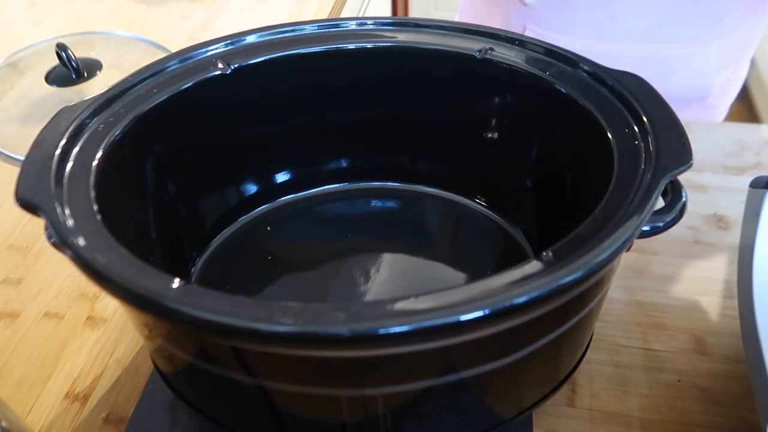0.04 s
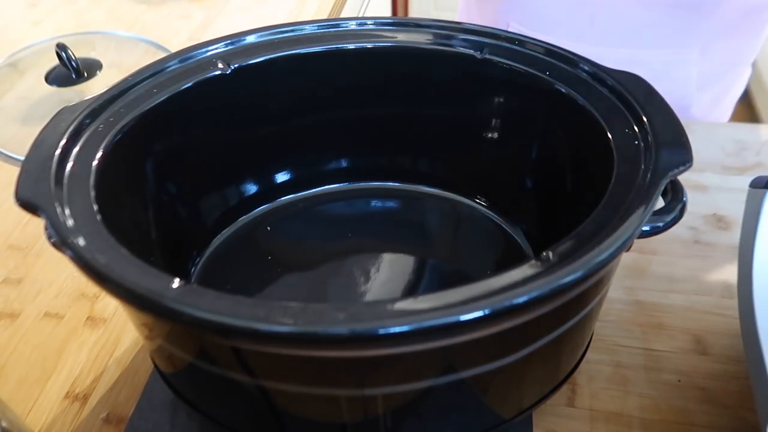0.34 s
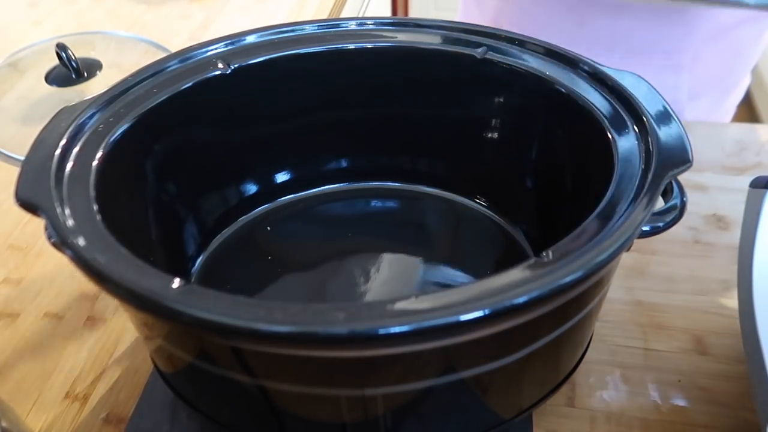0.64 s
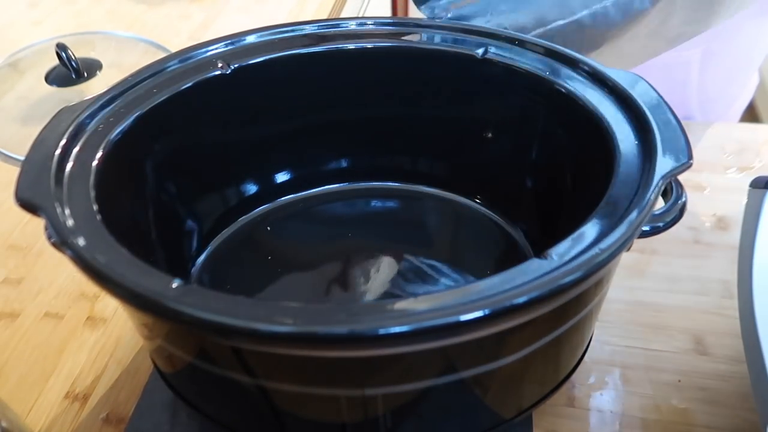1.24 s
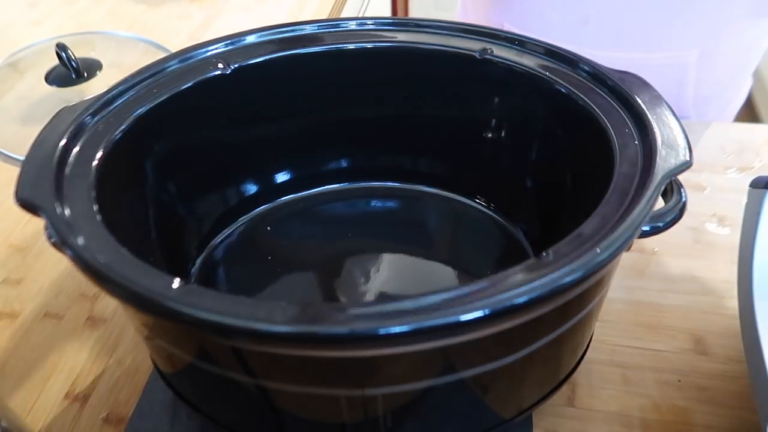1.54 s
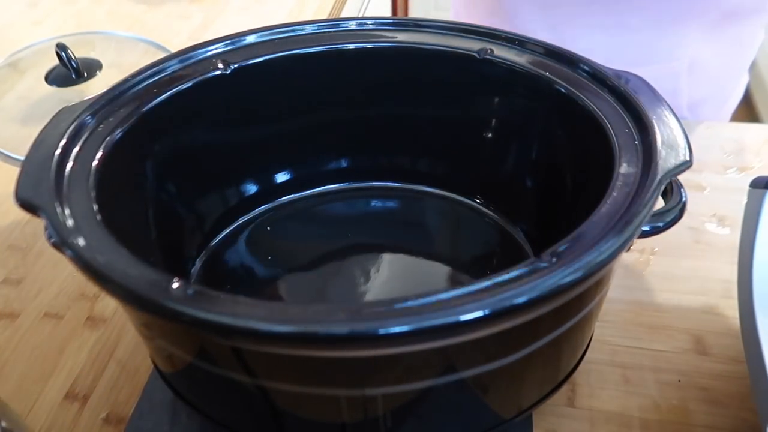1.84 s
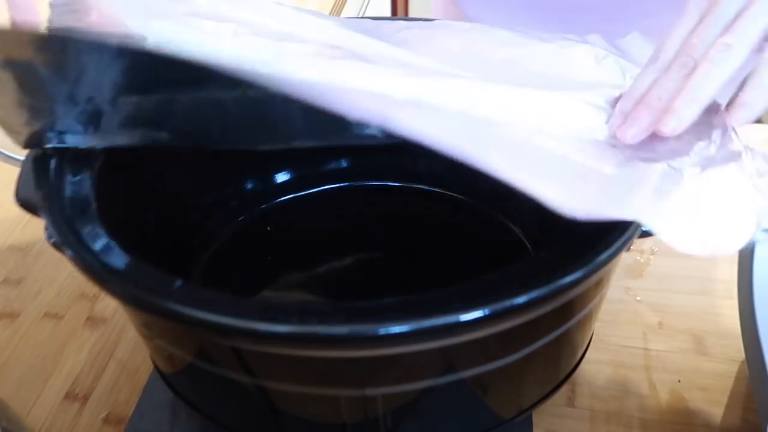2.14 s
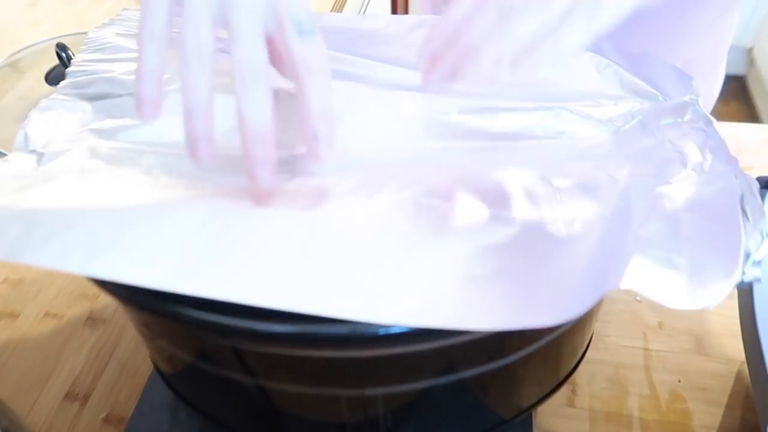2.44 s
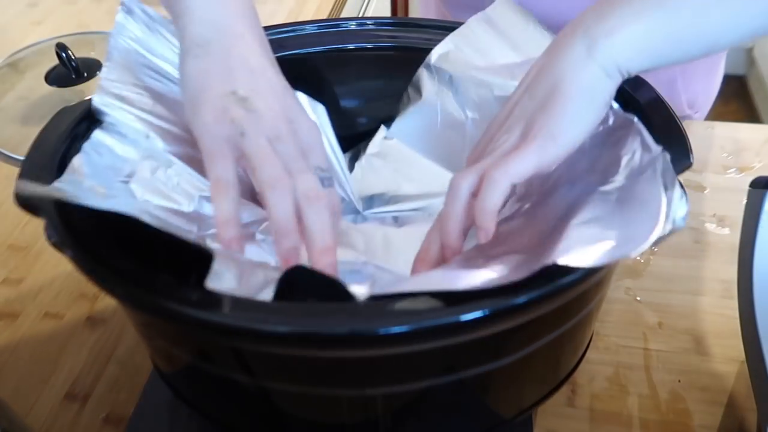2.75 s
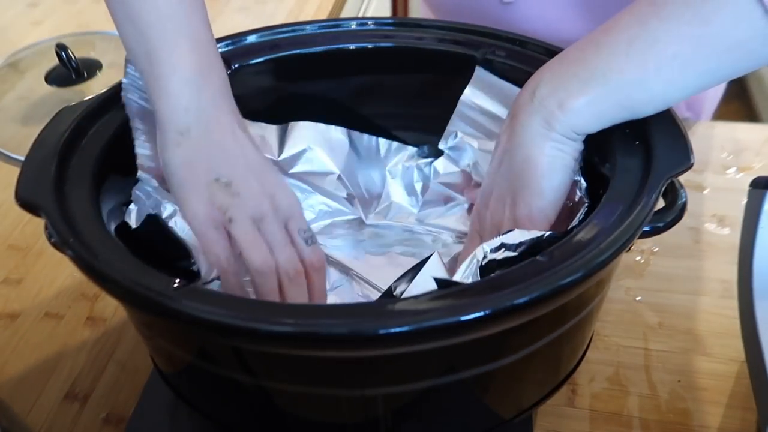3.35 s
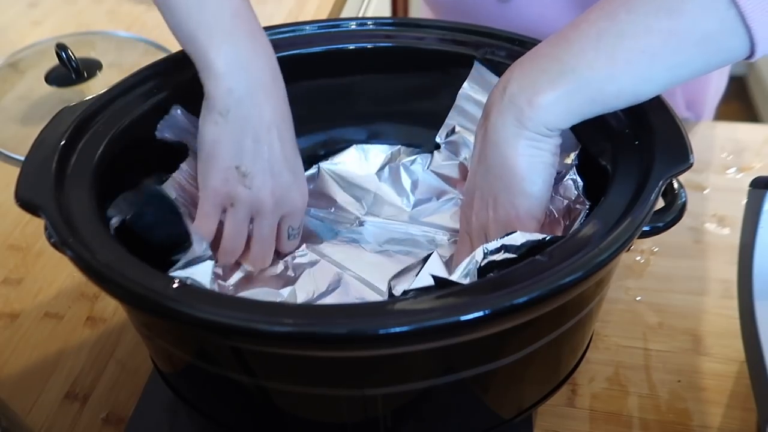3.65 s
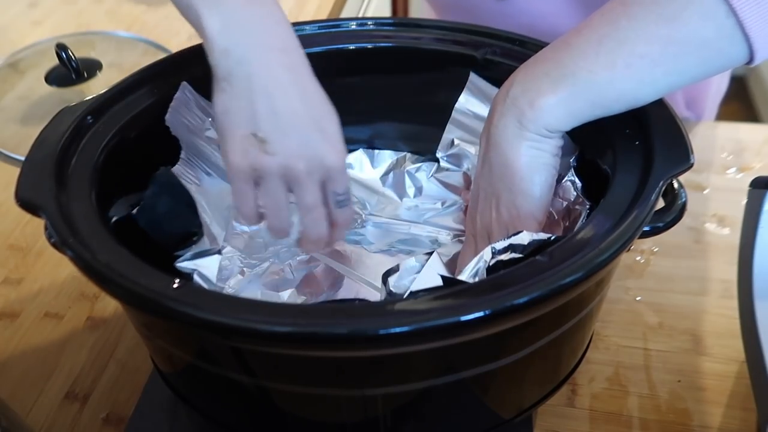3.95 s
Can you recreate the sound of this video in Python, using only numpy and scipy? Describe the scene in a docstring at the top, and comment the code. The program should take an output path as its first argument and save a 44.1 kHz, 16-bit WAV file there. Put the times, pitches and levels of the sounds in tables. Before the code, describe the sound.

Aluminum foil crackles off its roll, slightly to one side, with soft bumps, and tears sharply at 0.6 seconds. At 1 second its cardboard box knocks hollowly on the counter. The loose sheet rustles from 1.4 seconds and crinkles over a ceramic pot, straight ahead, around 2. From 2.5 to 4 seconds, hands crush it inside in louder, uneven crunches, close by in a small kitchen.

```python
"""A small kitchen, close to a wooden counter, in stereo. A little to one side, aluminium foil is pulled
off its roll and torn on the cutter, and the box is set down. The loose sheet rustles through the air;
straight ahead, it is spread over a ceramic cooker pot and two hands crush it into the hollow.
Every rustle is a swarm of tiny buckling creases that ring facets of foil."""
import sys
import numpy as np
from scipy import signal
from scipy.fft import rfft, irfft
from scipy.io import wavfile
from scipy.ndimage import uniform_filter1d

SR = 44100
rng = np.random.default_rng(int(sys.argv[2]) if len(sys.argv) > 2 else 0)


def store_wav(level_fs):
    """Save 16-bit WAV to argv[1]."""
    pcm = np.round(np.clip(np.atleast_2d(level_fs), -1, 1) * 32767)
    wavfile.write(sys.argv[1], SR, pcm.T.astype(np.int16))


N = 176400
T = np.arange(N) / SR


def amp(db):
    """Decibels to gain."""
    return 10 ** (np.asarray(db) / 20)


def rms(x):
    """Mean strength."""
    return np.sqrt(np.mean(x ** 2) + 1e-20)


def value_at(points, hz):
    """A spectrum's value at any frequency."""
    point_hz, value = np.transpose(points)
    return np.interp(np.log(hz + 1), np.log(point_hz + 1), value)


def add(mix, start_s, sound):
    """Lays a sound into the mix."""
    part = mix[..., round(start_s * SR):][..., :sound.shape[-1]]
    part += sound[..., :part.shape[-1]]


def ring(x, response):
    """Convolves, keeping the length."""
    return signal.fftconvolve(np.atleast_2d(x), np.atleast_2d(response), axes=1)[:, :x.shape[-1]]


def colour(x, tone, size=4096):
    """Minimum-phase filter with the given spectrum."""
    log_gain = np.log(amp(value_at(tone, abs(np.fft.fftfreq(size, 1 / SR)))))
    spectrum = np.exp(np.conj(signal.hilbert(log_gain)))
    return ring(x, np.fft.ifft(spectrum).real[:size // 2])


# Room tone at the microphone (frequency [Hz], level [dB])
ROOM_TONE = [(20, -2), (60, -9), (200, -4.5), (1000, -2), (5000, 3), (15000, -81)]
def room_tone():
    """The faint, steady hiss of the kitchen."""
    air = colour(rng.standard_normal((2, N)), ROOM_TONE)
    return amp(-49) * air / rms(air)


# Reverberation around the counter (frequency [Hz], t60 [s])
KITCHEN_DECAY = [(100, 0.3), (800, 0.46), (3000, 0.37), (8000, 0.56), (15000, 0.1)]
def kitchen(x, wet_db):
    """Adds the room: sparse reflections, each band dying at its own speed."""
    taps = rng.choice([-1., 1.], (2, SR // 2)) * (rng.random((2, SR // 2)) < 1 / 16)
    taps *= T[:SR // 2] > .004  # the direct sound arrives first
    hz, t, bands = signal.stft(taps, SR, nperseg=256)
    tail = signal.istft(bands * amp(-60 * t / value_at(KITCHEN_DECAY, hz)[:, None]), SR)[1]
    reverb = ring(x, tail / np.linalg.norm(tail[0]))
    return (x + amp(wet_db) * reverb) / np.hypot(1, amp(wet_db))


def crease(hz, t60, ringing):
    """One crease buckles: a tick, a brief shiver and a briefer ring of the facet beside it (mid, side)."""
    t = T[:SR // 25]
    note = np.exp(-t / .0025) * np.sin(2 * np.pi * (hz * t + rng.random((2, 1))))
    shiver = rng.standard_normal((2, len(t)))
    tick = 0.17 * np.exp(-t / 0.000052)
    out = (shiver + 2 * ringing * note) * (amp(-60 * t / t60) + tick)
    return out / np.linalg.norm(out[0])


def creases(per_s, spread_db, min_t60, ringing, facets=120):
    """A swarm of creases of uneven size, each ringing one of many facets."""
    size = amp(spread_db * np.minimum(rng.exponential(1, N), 4)) * (rng.random(N) < per_s / SR)
    size /= np.sqrt(abs(uniform_filter1d(size ** 2, size=1300)) + 0.0027)  # evens out the loudness
    size *= rng.choice([-1, 1], N)
    which, out = rng.integers(0, facets, N), np.zeros((2, N))
    pitches = np.geomspace(1300, 7000, facets)
    sounds = [crease(hz, min_t60 * rng.uniform(1.0, 2.46), ringing) for hz in pitches]
    for i in np.flatnonzero(size):
        add(out, T[i], size[i] * sounds[which[i]])
    return out


def handled(swarm, curve, fade_s):
    """Mids, bass and treble of a swarm swell with the handling, which fades at both ends."""
    times, *levels = np.transpose(curve)
    hz, spectrum = np.fft.rfftfreq(N, 1 / SR), rfft(swarm)
    bass = 1 / (1 + (hz / 1000) ** 8)
    treble = 1 - 1 / (1 + (hz / 5500) ** 8)
    bands = [irfft(spectrum * share, N) for share in (1 - bass - treble, bass, treble)]
    fade = np.sqrt(np.clip(.5 + np.minimum(T - times[0], times[-1] - T) / fade_s, 0, 1))
    return fade * sum(band / rms(band[0]) * amp(np.interp(T, times, db)) for band, db in zip(bands, levels))


# Foil leaving the roll (time [s], mid level [dB], bass level [dB], treble level [dB])
PULL_LEVELS = [(0.0, -29.5, -44.5, -36), (0.064, -25, -43.5, -30.5), (0.118, -31.5, -42.5, -34.5),
               (0.162, -27.5, -37, -31.5), (0.21, -29.5, -47, -34.5), (0.276, -23.5, -37.5, -29.5),
               (0.332, -23.5, -39, -27), (0.558, -28.5, -44, -35.5), (0.606, -25, -40.5, -32.5),
               (0.628, -11.5, -25, -27), (0.637, -23.5, -36.5, -30.5), (0.74, -37, -48, -41.5)]
# Its colour from close by (frequency [Hz], level [dB])
PULL_TONE = [(40,-32), (110,-12.5), (235,-7.5), (350,-3), (520,-10.5), (1490,-1), (2920,4.5), (5720,-1),
             (9500,-9.5), (12500,-12.5), (15500,-40)]
def pull():
    """Foil peels off the turning roll in a fine dense crackle."""
    swarm = colour(creases(per_s=3000, spread_db=-0.5, min_t60=0.0073, ringing=0.2), PULL_TONE)
    return amp(-0.28) * kitchen(handled(swarm, PULL_LEVELS, fade_s=0.022), wet_db=-11)


def sparkle(curve, offset_db, per_s=4000):
    """A very high, fine sizzle over the foil's rustle, swelling steeply with its treble level."""
    times, _, _, treble_db = np.transpose(curve)
    ticks = rng.standard_normal((2, N)) * (rng.random(N) < per_s / SR)
    ticks = signal.sosfilt(signal.butter(6, 11200, "high", fs=SR, output="sos"), ticks)
    swell = amp(offset_db + 1.91 * np.interp(T, times, treble_db))
    return ticks / rms(ticks) * swell * (T > times[0]) * (T < times[-1])


# The roll in its box, almost dry (time [s], level [dB], pitch [Hz])
ROLL_BUMPS = [(0.263, -22.5, 300), (0.31, -26.5, 119), (0.373, -31, 128), (.674, -23, 335)]
def roll_bumps(t60=.04):
    """The roll thuds softly against its box as it turns and stops."""
    out, t = np.zeros((2, N)), T[:SR // 5]
    attack = np.minimum(t / .003, 1)
    for start_s, db, hz in ROLL_BUMPS:
        add(out[0], start_s, amp(db - 60 * t / t60) * attack * np.sin(2 * np.pi * hz * t))
    return kitchen(out, wet_db=-23)


# Colour of the rip at the cutter (frequency [Hz], level [dB])
TEAR_TONE = [(40,-20), (100,-15), (200,-23), (300,-8), (400,-5), (520,-16), (1000,-22), (1800,-4), (2100,0),
             (2500,-4), (3150,5), (3800,-10), (8000,-15), (15500,-18)]
def tear(part_s=.628, rise_s=0.0062, fall_s=0.0027):
    """A quickly swelling run of cracks along the cutter's teeth, and one sharp crack as the sheet parts."""
    swell = np.exp(np.minimum((T - part_s) / rise_s, (part_s - T) / fall_s))
    teeth = colour(creases(per_s=6600, spread_db=-2.5, min_t60=0.002, ringing=0.47, facets=60), TEAR_TONE)
    out = amp(-6.5) * swell * 2 * np.tanh(teeth / rms(teeth[0]) / 2)
    crack = colour(crease(2330, t60=0.014, ringing=0.53), TEAR_TONE)
    add(out, part_s - .001, amp(-2) * crack / abs(crack[0]).max())
    out = signal.lfilter(*signal.butter(2, 170, "high", fs=SR), out)
    return kitchen(out, wet_db=-8) * amp([[0], [-4]])  # less side: a narrower image


# The sheet above the counter (time [s], mid level [dB], bass level [dB], treble level [dB])
CARRY_LEVELS = [(.74,-36.5,-51,-44), (.96,-38,-57,-45), (1.19,-44,-62,-54), (1.29,-41,-62,-50),
                (1.355,-34,-55,-42), (1.424,-32,-48,-38), (1.431,-26,-42,-33), (1.462,-20,-39,-27.5),
                (1.505,-26,-43,-31), (1.544,-23,-39,-29.5), (1.604,-33,-52,-38), (1.662,-24,-44,-30),
                (1.72,-24,-46,-30), (1.77,-26.5,-49,-32), (1.8,-22,-47,-27), (1.86,-23.5,-48,-29),
                (1.95,-28,-49,-37)]
# Its colour in the air (frequency [Hz], level [dB])
CARRY_TONE = [(40,-38), (130,-20), (520,-16), (900,-11), (1500,-8), (2600,-2), (4400,-1.5), (8500,-9),
              (10700,-19.5), (12800,-17.5), (15500,-43)]
def carry():
    """The loose sheet rustles as it flexes in the air."""
    swarm = colour(creases(per_s=2200, spread_db=0, min_t60=0.019, ringing=0.5), CARRY_TONE)
    return amp(-0.92) * kitchen(handled(swarm, CARRY_LEVELS, fade_s=0.17), wet_db=-11)


# The box landing, with plenty of room around it (time [s], level [dB], low-pass cutoff [Hz])
BOX_KNOCKS = [(1.002, -26, 680), (1.0345, -8, 3800), (1.056, -21, 1500), (1.069, -19, 1600)]
# Its hollow body (frequency [Hz], level [dB], t60 [s])
BOX_MODES = [(139, -14, .07), (326, -2, 0.055), (558, -5, 0.12), (690, 9, 0.033), (839, -5.5, 0.17),
             (1067, -5, 0.11), (1330, 4, 0.064), (1500, -5, 0.045)]
# Its rattle (frequency [Hz], level [dB])
RATTLE_TONE = [(40, -39), (120, -4), (330, -2), (460, -5), (600, 4), (780, 1), (950, -4.5), (1450, -1),
               (1750, -11), (3800, -6.5), (5000, -27), (15000, -73)]
def box_knocks():
    """The cardboard box knocks hollowly on the counter and settles."""
    out, t = np.zeros((2, N)), T[:SR // 3]
    body = modes(BOX_MODES).sum(0)
    attack = np.minimum(t / 0.0018, 1)
    for start_s, db, cutoff_hz in BOX_KNOCKS:
        rattle = colour(rng.standard_normal(len(t)) * amp(-60 * t / 0.058), RATTLE_TONE)[0]
        blow = attack * body / abs(body).max() + amp(-4) * rattle / abs(rattle).max()
        blow = signal.lfilter(*signal.butter(2, cutoff_hz, fs=SR), blow)
        add(out, start_s, amp(db) * blow / abs(blow).max())
    out = signal.sosfilt(signal.butter(6, 88, "high", fs=SR, output="sos"), out)
    return kitchen(out, wet_db=-5)


def modes(table):
    """A body's resonances: one decaying sine per row."""
    t = T[:SR // 3]
    return np.array([amp(db - 60 * t / t60) * np.cos(2 * np.pi * hz * t) for hz, db, t60 in table])


# Large folds giving way close by (time [s], relative level [dB], ring [Hz], crunch t60 [s])
FOLD_SNAPS = [(1.5258, -9, 2590, .1), (2.5192, -10, 2500, .15), (2.6195, -5, 3560, .05),
              (2.6484, -5, 3520, .04), (2.7916, -9, 2370, .08), (2.8655, -6.5, 1500, .03),
              (2.9653, -10, 3120, .06), (3.021, -7, 2070, .1), (3.0864, -4, 3150, .03),
              (3.1499, -4, 3130, .06), (3.2354, -4, 2590, .05), (3.3379, -11, 2600, .15),
              (3.5564, -9, 2580, .06), (3.5844, -7, 2330, .1), (3.6447, -4, 2020, .1),
              (3.6574, -5, 2520, .03), (3.954, -16.5, 2550, .15)]
# Colour of snapping and crushed foil (frequency [Hz], level [dB])
CRUSH_TONE = [(40,-29), (110,-15.5), (190,-16), (250,-18), (333,-9), (460,-12), (750,-3), (1020,-6.5),
              (1200,-6), (1700,-1), (2600,1.5), (3300,2), (4000,-2.5), (4900,-10.5), (7000,-18.5),
              (9500,-27), (12400,-21), (15500,-31.5)]
def fold_snaps():
    """A large fold pops and sets off a dying run of smaller creases: one crunch."""
    pops, swell, t = np.zeros((2, N)), np.zeros(N), T[:SR // 5]
    run = colour(creases(per_s=1000, spread_db=1.5, min_t60=.01, ringing=.3, facets=40), CRUSH_TONE)
    for start_s, db, hz, run_t60 in FOLD_SNAPS:
        pop = colour(crease(hz, t60=0.029, ringing=0.7), CRUSH_TONE)
        add(pops, start_s, amp(db - 4) * pop / abs(pop[0]).max())
        add(swell, start_s, amp(db - 13 - 60 * t / run_t60))
    return pops + swell * run / rms(run[0])


# Foil on the rim, straight ahead (time [s], mid level [dB], bass level [dB], treble level [dB])
LAY_LEVELS = [(1.95, -26.5, -43.5, -38), (2.06, -31, -50.5, -37.5), (2.09, -24.5, -43.5, -34),
              (2.115, -29, -45.5, -39.5), (2.21, -25, -40, -34.5), (2.305, -26.5, -47, -35.5),
              (2.34, -32, -41.5, -40), (2.362, -23.5, -43, -36), (2.434, -36, -47, -42.5),
              (2.505, -34.5, -56, -46)]
# Its colour there (frequency [Hz], level [dB])
LAY_TONE = [(40, -37), (114, -18.5), (309, -15.5), (1080, -13.5), (1650, -5.5), (2700, 0.5), (3700, -1),
            (9180, -17), (12400, -16), (15500, -22)]
def lay():
    """The sheet crinkles as it is spread over the pot's rim."""
    swarm = colour(creases(per_s=1800, spread_db=0, min_t60=0.016, ringing=0.35), LAY_TONE)
    return amp(-0.37) * kitchen(handled(swarm, LAY_LEVELS, fade_s=0.12), wet_db=-10)


def hands_over_pot(swarm, depth_db):
    """As the hands move over the pot and cover parts of it, broad patches of the colour come and go."""
    bands = signal.stft(swarm, nperseg=512)[2]
    patch = np.outer(np.hanning(17), np.hanning(13))  # smooths over frequency and time
    drift = signal.fftconvolve(rng.standard_normal(bands.shape[1:]), patch, "same")
    return signal.istft(bands * amp(depth_db * drift / rms(drift)))[1][:, :N]


# Foil down in the pot (time [s], mid level [dB], bass level [dB], treble level [dB])
CRUSH_LEVELS = [(2.505, -36, -57, -48), (2.525, -20, -29, -25.5), (2.56, -22, -37.5, -22.5),
                (2.595, -18.5, -30, -23), (2.733, -24.5, -36, -32), (2.85, -24.5, -38.5, -31.5),
                (3.011, -22, -38, -32), (3.028, -16, -32.5, -28), (3.06, -16, -35, -26),
                (3.125, -25, -38.5, -33.5), (3.18, -21.5, -35.5, -32), (3.232, -18.5, -34, -27.5),
                (3.319, -27.5, -44, -35.5), (3.35, -21.5, -36, -31.5), (3.455, -31.5, -47.5, -42),
                (3.575, -20.5, -35, -29.5), (3.599, -15.5, -28, -25.5), (3.633, -22, -42, -31.5),
                (3.655, -20.5, -28.5, -26), (3.695, -20.5, -41, -32.5), (3.731, -19, -36, -30),
                (3.761, -29, -49, -37.5), (3.806, -22.5, -39.5, -37), (3.83, -32, -42.5, -38.5),
                (3.908, -21.5, -42, -36.5), (3.943, -32.5, -53, -43.5), (4.0, -30.5, -57, -47)]
# The pot's hollow (frequency [Hz], relative level [dB], t60 [s])
POT_MODES = [(336, -12, 0.13), (553, -7, 0.12), (1210, -5.5, 0.064), (1860, -14, 0.038), (2060, -11, 0.044),
             (2530, -11, 0.023)]
def crush():
    """Fingers crush the sheet in coarse crackles; these and the fold snaps ring the hollow of the pot."""
    swarm = colour(creases(per_s=900, spread_db=1, min_t60=0.031, ringing=0.21, facets=200), CRUSH_TONE)
    foil = amp(-0.61) * handled(hands_over_pot(swarm, depth_db=1.6), CRUSH_LEVELS, fade_s=.005) + fold_snaps()
    # scaled so that a mode's gain at resonance does not depend on its decay
    hollow = sum(mode * 2 * np.log(1000) / (t60 * SR)
                 for mode, (_, _, t60) in zip(modes(POT_MODES), POT_MODES))
    return kitchen(foil + amp(6.5) * ring(foil, hollow), wet_db=-10.5)


def stereo(mid_side, width, aside):
    """Mid and side to left and right; only the treble is wide, and sound from aside lags on the left."""
    mid, side = rfft(mid_side)
    side = np.sqrt(1 - aside ** 2) * side - 1j * aside * mid
    side = irfft(side * amp(value_at(width, np.fft.rfftfreq(N, 1 / SR))), N)
    return np.array([mid_side[0] + side, mid_side[0] - side])


# Width at the microphone, for the counter and for the pot (frequency [Hz], side gain [dB])
COUNTER_WIDTH = [(300, -31), (1400, -55.5), (3100, -13), (4500, -2.5), (6800, 1), (10000, 10),
                 (15000, 11.5)]
POT_WIDTH = [(300, -21.5), (1400, -54), (3100, -50.5), (4500, -2.5), (7500, -0.5), (10500, 7),
             (12500, -4.5), (15000, 1)]
def scene():
    """The work at the counter lies a little to one side of the microphone, the pot straight ahead."""
    counter = room_tone() + pull() + roll_bumps() + tear() + carry() + box_knocks()
    counter += sparkle(PULL_LEVELS, offset_db=9) + sparkle(CARRY_LEVELS, offset_db=11)
    pot = lay() + crush()
    return stereo(counter, COUNTER_WIDTH, aside=0.41) + stereo(pot, POT_WIDTH, aside=0)


def record(dry, ceiling=.85, cutoff_hz=15700):
    """The very highest peaks clip, then the top of the treble is cut off."""
    low_pass = signal.firwin(511, cutoff_hz, window=("kaiser", 9), fs=SR)
    return signal.oaconvolve(np.clip(dry, -ceiling, ceiling), low_pass[None], "same")


dry = scene()
out = record(dry)
store_wav(out)
```